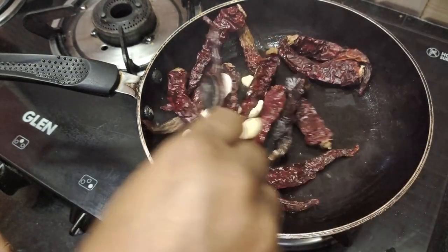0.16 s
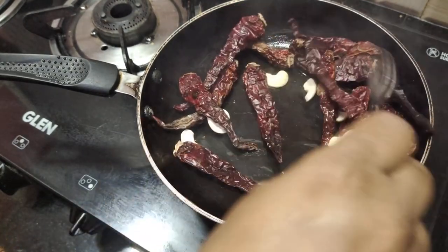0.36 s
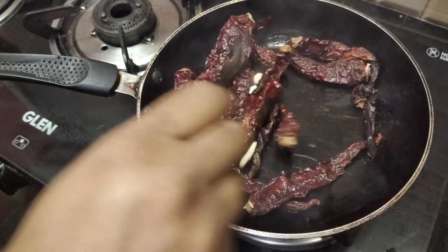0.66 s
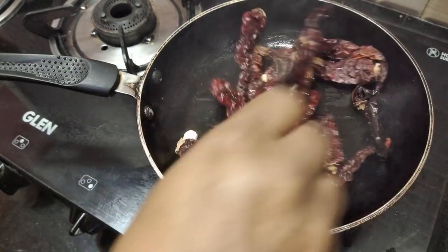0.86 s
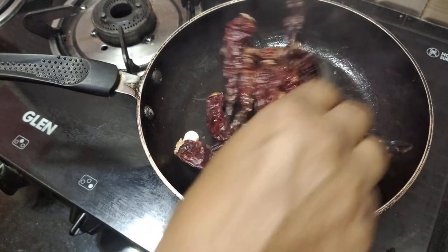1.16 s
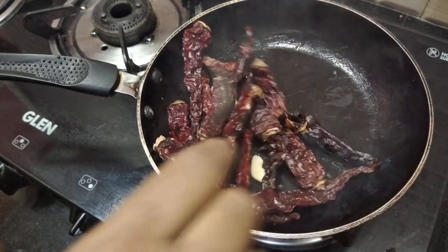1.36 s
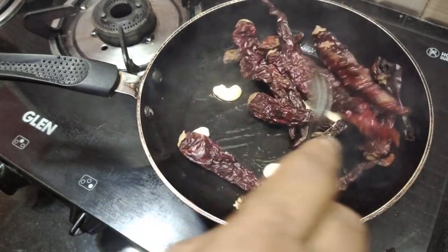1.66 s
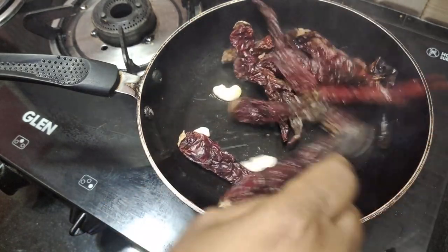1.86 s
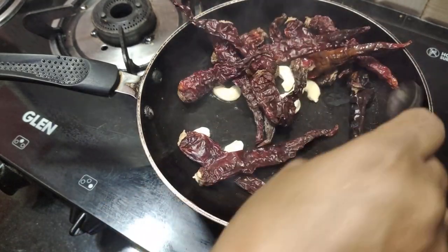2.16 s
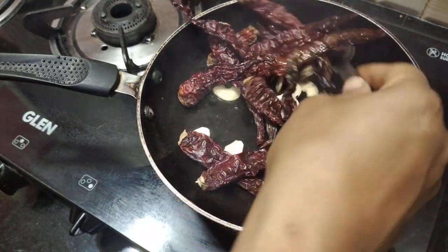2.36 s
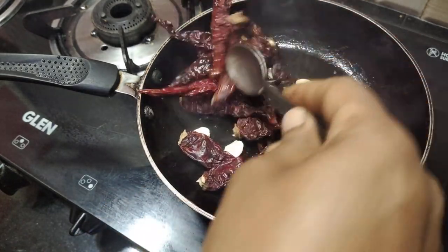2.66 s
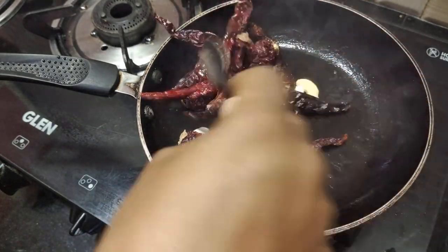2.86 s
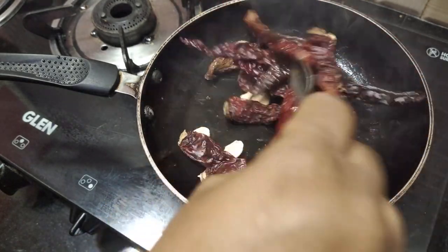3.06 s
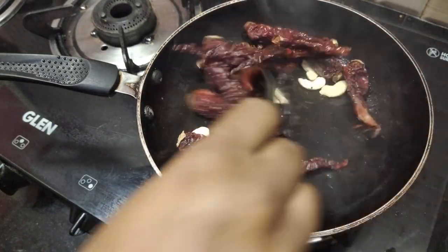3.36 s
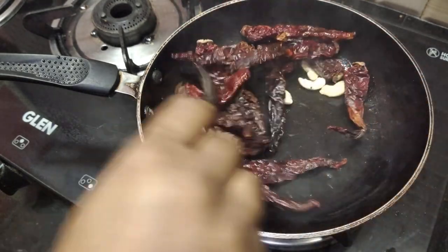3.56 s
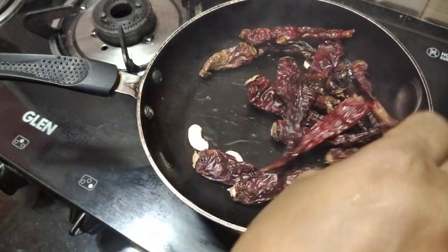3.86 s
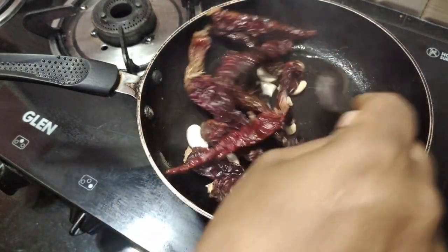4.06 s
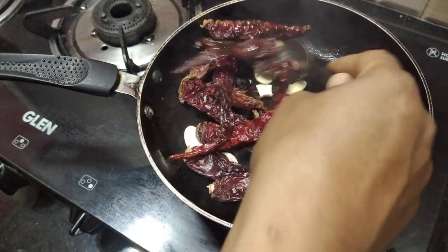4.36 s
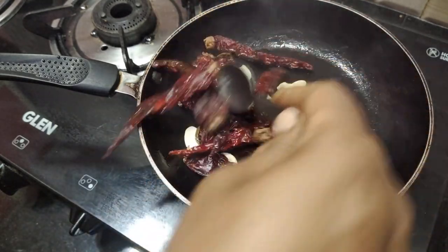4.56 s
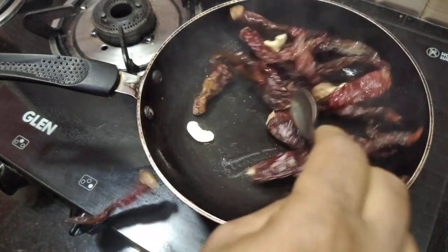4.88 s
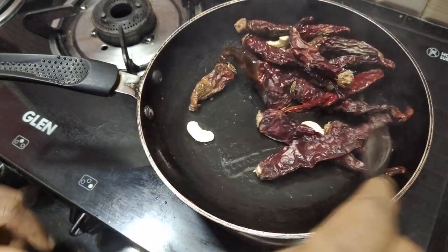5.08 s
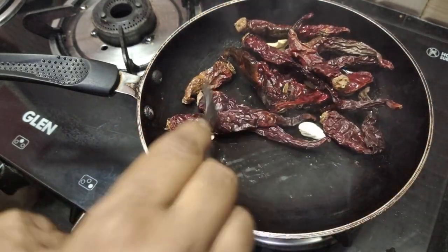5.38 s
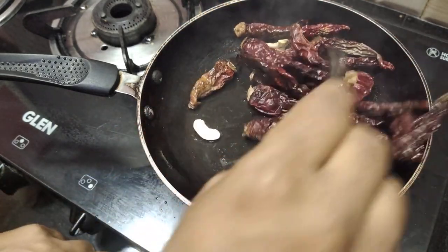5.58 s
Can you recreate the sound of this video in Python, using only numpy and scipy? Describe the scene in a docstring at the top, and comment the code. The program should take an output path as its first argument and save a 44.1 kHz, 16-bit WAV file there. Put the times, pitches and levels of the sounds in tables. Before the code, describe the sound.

A steel spoon stirs dry chillies and nuts in a frying pan, with crackling rustles, ringing scrapes, clinks and snaps.

```python
"""A small tiled kitchen, a phone's two microphones close to a frying pan on the gas hob.
A steel spoon stirs dry chillies and nuts. Each stroke sets the brittle pods crackling and drags the
spoon over the coating; it sticks and slips, so the pan rings and rocks on its grate. The spoon clinks,
knocks and once squeals up the wall, single pods snap, and the gas jets whistle thinly underneath."""
import sys
import numpy as np
from scipy import signal
from scipy.fft import rfft, irfft
from scipy.io import wavfile
from scipy.ndimage import map_coordinates

SR = 44100
rng = np.random.default_rng(int(sys.argv[2]) if len(sys.argv) > 2 else 0)


def digitize_waveform(pressure):
    """Quantize a signal to 16-bit integers and store it at the path in sys.argv[1].

    Rows of a 2-D input are taken as channels; values are limited to [-1, 1].
    """
    field = np.atleast_2d(pressure).T
    bounded = np.clip(field, -1, 1)
    quanta = np.round(bounded * 32767).astype(np.int16)
    wavfile.write(sys.argv[1], SR, quanta)


N = 252260
TIME = np.arange(N) / SR
RING_TIME = TIME[:SR // 2]
SIDES = np.array([[.5], [-.5]])  # splits a difference between left and right

# modes of the pan: (frequency [Hz], relative level [dB], t60 [s])
PAN_MODES = [(295.5, -24, 0.086), (329, -9.5, 0.15), (366.6, -13, 0.09), (500, -15, 0.018),
             (558, -6, 0.043), (669, -7.5, 0.072), (740, -11, 0.052), (975.7, 3.5, 0.075),
             (1004.4, -0.5, 0.088), (985, -15.5, 0.064), (1035, -8, 0.084), (1059.9, 17.5, 0.067),
             (1140, -24, .06), (1560, -13, 0.06), (1720, -23, 0.08), (1742, -7.5, 0.077),
             (1811.5, 0.5, 0.057), (1846, -3, 0.074), (1990, -2, 0.021), (2080, -23.5, 0.1),
             (2380, -34, 0.064), (2890, -13, 0.07)]
# the pan's rocking, base and wall registers: (low edge [Hz], high edge [Hz])
PAN_REGISTERS = [(275, 1030), (1000, 1250), (1330, 2700)]
# modes of the pan's stiff upper wall: (frequency [Hz], relative level [dB], t60 [s])
UPPER_WALL_MODES = [(2670, -2, 0.11), (3320, -11, 0.0044), (4090, -9, 0.063), (4573, -3.5, 0.062),
                    (5740, 0.5, 0.03), (6400, -9, 0.02), (7600, -10, 0.035), (7400, -8, 0.017),
                    (8450, -9, 0.03), (9900, -12, 0.017)]
# modes of the spoon: (frequency [Hz], relative level [dB], t60 [s])
SPOON_MODES = [(630, -16, 0.03), (700, -10, 0.03), (2080, -14, 0.069), (2229, 12.5, 0.028),
               (2523, 7, 0.041), (2820, -1, 0.069), (3200, -12.5, .03), (7300, -10, .035),
               (7920, 2.5, 0.079), (7810, -1, .03), (10060, -11, 0.12), (11600, -11.5, 0.017)]
# where the ringing metal sits between the microphones: (frequency [Hz], left minus right [dB])
METAL_BALANCE = [(330, -7.5), (670, 8.5), (1060, -4), (1850, 2.5), (2800, 3.5), (8000, -1), (12000, 13)]
# spoon against pan: (time [s], rocking [dB], base [dB], wall [dB], contact tick [dB])
SPOON_KNOCKS = [(0.372, -81, -35, -32, -43), (0.409, -83, -41, -45, -63), (0.433, -85, -36.5, -36, -59),
                (0.499, -85, -61, -47, -65), (0.531, -79, -43, -50, -62), (0.577, -83, -44.5, -41.5, -42.5),
                (0.636, -84, -65, -49, -68), (0.681, -93, -44, -57, -62), (0.701, -90, -52, -58, -66),
                (0.79, -86, -46.5, -40, -62), (0.899, -90, -53.5, -50, -72), (0.942, -84, -54.5, -83, -64),
                (1.156, -38.5, -32.5, -39, -36.5), (1.282, -79, -74, -54, -60),
                (1.398, -90, -44.5, -63, -47), (1.446, -76, -48.5, -62, -54),
                (1.79, -73, -51.5, -56.5, -72), (2.183, -45, -46, -44.5, -38), (2.34, -61, -45, -56, -73),
                (2.935, -72, -71, -57, -57.5), (3.045, -85, -46.5, -58, -56), (3.213, -76, -62.5, -68, -56),
                (3.326, -78, -42.5, -58, -51), (3.41, -90, -42.5, -59, -50), (3.595, -73, -56, -53, -50),
                (3.612, -83, -56, -54, -51), (3.714, -81, -56, -48.5, -46.5),
                (3.919, -44, -35.5, -50, -45.5), (3.934, -48.5, -51, -48.5, -67),
                (3.97, -71, -44, -63, -50), (4.251, -44, -35, -50.5, -43.5), (4.269, -46, -42.5, -55, -72),
                (4.345, -50, -53, -50, -60), (4.375, -86, -57, -42, -42.5), (4.4, -81, -43.5, -45.5, -62),
                (4.491, -73, -46, -40, -67), (4.632, -85, -47, -48.5, -67), (4.85, -64, -46.5, -62, -68),
                (4.95, -52.5, -43.5, -63, -54), (5.125, -95, -69, -54, -46.5)]
# the spoon's edge squeals up the wall: (time [s], rough ringing [dB], clear note [dB])
WALL_SQUEAL = [(4.28, -57, -66), (4.305, -61, -69), (4.33, -52, -48.5), (4.358, -47, -42),
               (4.375, -53, -49), (4.41, -48, -49), (4.43, -62, -69), (4.45, -68, -72)]


def undb(db):
    """Decibels to gain."""
    return 10 ** (np.asarray(db) / 20)


def rms(x):
    """Root mean square."""
    return np.sqrt(np.mean(x ** 2))


def curve(rows, column=1):
    """Gain over time from a dB column; silent outside the table."""
    rows = np.asarray(rows)
    return undb(np.interp(TIME, rows[:, 0], rows[:, column], left=-np.inf, right=-np.inf))


def at_hz(hz, rows, column=1):
    """A column of a spectrum table, read on a log-frequency axis."""
    rows = np.asarray(rows, float)
    return np.interp(np.log(hz + 1), np.log(rows[:, 0]), rows[:, column])


def through(x, response):
    """Pass a sound through an impulse response for each microphone."""
    return signal.fftconvolve(np.atleast_2d(x), response, axes=1)[:, :np.shape(x)[-1]]


def fade(t60):
    """Exponential decay, 60 dB in t60 seconds."""
    return np.exp(-np.log(1000) * RING_TIME / max(t60, 1e-3))


def ring_noise():
    """Half a second of white noise in two channels."""
    return rng.standard_normal((2, len(RING_TIME)))


def add(out, start_s, sound):
    """Mix a sound in at a time."""
    i = max(int(start_s * SR), 0)
    out[:, i:i + sound.shape[1]] += sound[:, :N - i]


def unit_blow(x):
    """Scale a blow to rms 1 over its first 20 ms."""
    return x / rms(x[:, :SR // 50])


def colour(rows, column=1, size=1024):
    """Minimum-phase response with the given spectral shape and unit energy."""
    magnitude = undb(at_hz(np.fft.rfftfreq(size, 1 / SR), rows, column))
    cepstrum = irfft(np.log(magnitude))
    cepstrum[1:size // 2] *= 2
    cepstrum[size // 2 + 1:] = 0
    response = irfft(np.exp(rfft(cepstrum)))
    return response / np.linalg.norm(response)


def grains(rate, spread_db):
    """Random tiny contacts, many faint and a few strong; rms 1 at any rate."""
    chance = np.clip(rate / SR, 1e-4, 1)
    sizes = undb(spread_db * np.minimum(rng.exponential(size=N), 4.5))
    contacts = (rng.random(N) < chance) * sizes / np.sqrt(chance)
    return contacts / rms(contacts)


def flutter(rate, depth_db):
    """A gain that wanders at random about 1, with `rate` turns a second."""
    knots = rng.standard_normal(4000)
    gain = undb(depth_db * np.interp(TIME * rate, np.arange(len(knots)), knots))
    return gain / rms(gain)


def bend(sound, depth, rate):
    """A wandering delay slides all the resonances of a sound up and down."""
    lag_s = depth * np.log(flutter(rate, depth_db=2))
    positions = (TIME + lag_s) * SR
    return np.array([map_coordinates(side, [positions], order=3, mode="mirror") for side in sound])


def ring(modes, lo_hz, hi_hz, wash_db, wash_t60, skid_s):
    """One register of struck metal over a wash of crowded modes; a skid softens the start."""
    apart_hz = 1500  # shorter waves reach the two microphones further out of step
    tones = 0
    for hz, db, t60 in modes:
        if lo_hz <= hz < hi_hz:
            lag = min(hz / apart_hz, np.pi / 2) * SIDES
            detuned_hz = hz * (1 + 0.0031 * rng.standard_normal())
            phase = 2 * np.pi * detuned_hz * RING_TIME + 0.32 * rng.standard_normal((2, 1))
            gain = undb(db + at_hz(hz, METAL_BALANCE) * SIDES)
            tones += gain * fade(t60) * np.sin(phase - lag)
    mid, side = ring_noise() * fade(wash_t60)
    band = signal.butter(4, [lo_hz, hi_hz], "band", fs=SR, output="sos")
    wash = signal.sosfilt(band, mid + side * SIDES * min(hi_hz / apart_hz, 2))
    onset = 1 - np.exp(-RING_TIME / max(skid_s, 1e-4))
    return unit_blow((unit_blow(tones) + undb(wash_db) * unit_blow(wash)) * onset)


def effort(part, release):
    """Each push builds, eases as the heap gives way, then dies away over `release` of its settling."""
    # (start [s], rise [s], hold [s], settling [s], pods [dB], coating [dB], rocking [dB])
    strokes = [(-.012, 0.011, 0.063, 0.14, -45, -56, -66), (0.158, 0.071, 0.01, 0.28, -43, -42.5, -60),
               (0.356, 0.078, 0.18, 0.092, -47, -47, -72), (0.641, 0.0064, 0.035, 0.21, -48, -53.5, -70.5),
               (0.759, 0.0052, 0.083, 0.27, -43, -49, -72.5), (1.119, 0.062, 0.1, 0.18, -45, -49.5, -55),
               (1.372, 0.03, 0.0083, 0.16, -52.5, -50, -87), (1.473, 0.0022, 0.15, 0.25, -47, -50, -68),
               (1.778, 0.0095, 0.22, 0.087, -52.5, -61.5, -65.5),
               (1.898, 0.038, 0.041, 0.26, -45, -52, -67), (2.177, 0.05, 0.066, 0.28, -47.5, -48, -45.5),
               (2.487, 0.0081, 0.14, .05, -75, -77.5, -86), (2.586, 0.09, 0.0073, 0.17, -54.5, -69.5, -88),
               (2.933, 0.091, 0.043, 0.29, -50, -52, -82), (3.304, 0.059, 0.054, 0.11, -45.5, -49, -78),
               (3.539, 0.0082, 0.014, 0.0486, -57, -70, -85), (3.592, 0.016, 0.096, 0.25, -47, -50.5, -63),
               (3.912, 0.087, 0.061, 0.31, -48, -49, -64), (4.228, 0.017, 0.16, 0.066, -55, -58, -65),
               (4.354, 0.011, 0.012, 0.44, -47.5, -48, -67), (4.717, 0.21, 0.014, 0.17, -45, -52.5, -62),
               (5.112, 0.023, 0.18, 0.11, -51.5, -58, -66.5),
               (5.418, 0.0042, 0.097, 0.22, -45.5, -54, -72.5)]
    column = {"pods": 4, "coating": 5, "rocking": 6}[part]
    first_touch_db, settle_db = -10.5, 23.5
    approach_db_per_s, sag_db_per_s = 901, 12
    out = np.zeros(N)
    for row in strokes:
        start, rise, hold, settling = row[:4]
        t = TIME - start
        approach = approach_db_per_s * np.minimum(t, 0)  # the spoon brushes the first pods
        building = first_touch_db * np.clip(1 - t / rise, 0, 1)
        easing = sag_db_per_s * np.clip(t - rise, 0, hold)
        dying = settle_db * (np.maximum(t - rise - hold, 0) / (release * settling)) ** 1.355
        out = np.maximum(out, undb(row[column] + approach + building - easing - dying))
    return out


def rustle(push, pod, count=4):
    """Pods catch and slip, more often under a harder push; their hollow tones shift as they bend."""
    # skins sliding flat on the coating: (frequency [Hz], relative left [dB], relative right [dB])
    swish_spectrum = [(976, -42, -47), (4200, -5, 6.5), (5900, -11, -5), (8370, 5.5, 10.5),
                      (11050, -5, 2.5), (12860, 0, -3.5), (15200, -9.5, -1.5)]
    # how much they slide rather than tumble: (time [s], swish gain [dB])
    sliding = [(0, -4), (.9, -6.5), (1.3, -12), (1.7, -6), (2.7, 0.5), (3.1, -4), (3.8, -12), (4.35, 2),
               (4.62, -30), (4.8, -30), (5.7, -12)]
    tumble = 0
    turns = np.array([flutter(rate=25, depth_db=5) for _ in range(count)])
    for share in turns / np.linalg.norm(turns, axis=0):  # the pods share the push between them
        slips = grains(rate=650 * (push / push.max()) ** .5, spread_db=2) * share
        bearing = rng.uniform(0, 2 * np.pi, N)  # every slip radiates its own way
        slips = slips * np.array([np.cos(bearing), np.sin(bearing)])
        shell = through(ring_noise() * (fade(0.001) + undb(-7) * fade(0.028)), pod)
        shell *= np.linalg.norm(pod, axis=1, keepdims=True) / np.linalg.norm(shell, axis=1, keepdims=True)
        tumble += bend(through(slips, shell), depth=0.006, rate=8)
    skins = np.array([undb(1.5) * colour(swish_spectrum, 1), undb(1) * colour(swish_spectrum, 2)])
    swish = through(rng.standard_normal((2, N)), skins)
    catches = flutter(rate=73, depth_db=1.04)  # the whole heap catches and gives way
    return push * catches * (undb(2) * tumble + curve(sliding) * swish)


def crackles(push, count=700):
    """Tiny breaks scattered through the rustle, each with its own tone, size and direction."""
    low_hz, high_hz = 2020, 8760
    smallest_db, spread_db = -2, 4.5  # against the push
    t = RING_TIME[:SR // 50]
    decay = fade(t60=0.018)[:len(t)]
    out = np.zeros((2, N))
    for when, tone, rarity, turn in rng.random((count, 4)):
        i = int(when * (N - 1))
        size = push[i] * undb(smallest_db + spread_db * min(-np.log(rarity), 3))
        hz = low_hz * (high_hz / low_hz) ** tone
        ping = size * decay * np.sin(2 * np.pi * hz * t)
        bearing = 2 * np.pi * turn
        add(out, TIME[i], np.outer([np.cos(bearing), np.sin(bearing)], ping))
    return out


def rub(body, gain, rate, spread_db, bend_depth=0.00033):
    """Stick and slip: bouts of tiny jerks keep a body ringing; the moving contact bends its pitch."""
    bouts = np.minimum(flutter(rate=32, depth_db=4), 2)
    slips = grains(rate, spread_db) * rng.choice([-1, 1], N) * bouts
    ringing = through(slips * gain, body / np.sqrt(np.sum(body ** 2) / 2))
    return bend(ringing, bend_depth, rate=30)


def scrape():
    """The spoon drags on the coating: the pan rocks, base and wall ring, the spoon chatters and squeals."""
    # chatter of the loosely held spoon: (time [s], level [dB])
    chatter = [(0, -40.5), (.1, -50), (.135, -46), (.17, -51.5), (.34, -45.5), (.52, -48.5), (.66, -55.5)]
    rocking_hz, base_hz, wall_hz = PAN_REGISTERS
    drag = effort("coating", release=0.61)
    shove = effort("rocking", release=0.61)
    rocking = ring(PAN_MODES, *rocking_hz, wash_db=-16.5, wash_t60=0.024, skid_s=0.0012)
    out = rub(rocking, np.hypot(shove, rattle()), rate=700, spread_db=2, bend_depth=0.0024)
    base = ring(PAN_MODES, *base_hz, wash_db=-49.5, wash_t60=0.013, skid_s=0.0024)
    out += rub(base, undb(-1.5) * drag, rate=700, spread_db=2, bend_depth=0.00017)
    wall = ring(PAN_MODES, *wall_hz, wash_db=-11, wash_t60=0.096, skid_s=0.00025)
    wall_drive = np.hypot(undb(-5) * drag, undb(-7.5) * bites())
    out += rub(wall, wall_drive, rate=900, spread_db=3)
    spoon = ring(SPOON_MODES, 640, 3440, wash_db=-1, wash_t60=0.032, skid_s=0.0015)
    out += rub(spoon, curve(chatter), rate=500, spread_db=3.5)
    upper_wall = ring(UPPER_WALL_MODES, 5000, 12500, wash_db=-6, wash_t60=0.014, skid_s=0.0017)
    return out + rub(upper_wall, curve(WALL_SQUEAL), rate=2500, spread_db=3, bend_depth=0.00078)


def burner():
    """Gas jets whistle in narrow, restless bands over the room tone of the kitchen."""
    # (frequency [Hz], relative level [dB])
    room_tone = [(25, 6), (60, -11), (100, 19.5), (200, 9), (330, 10.5), (600, 7.5), (1500, -4),
                 (4000, -12), (8000, 8.5), (10000, 14.5), (11000, -9), (13500, 3), (16000, -17)]
    # whistling bands: (centre [Hz], nominal width [Hz], level before the drift [dB])
    jets = [(7330, 230, -75.5), (8750, 210, -62.5), (9470, 210, -60.5), (9600, 140, -63.5),
            (9950, 110, -73.5)]
    # the whistle slowly sinks: (time [s], gain [dB])
    drift = [(0, 4), (1.8, 0.5), (2.9, 0), (3.9, -2.5), (4.7, -3), (5.4, -9)]
    drift_db = np.interp(TIME, *np.transpose(drift))
    hz = np.fft.rfftfreq(N, 1 / SR)
    out = undb(-73.5) * through(rng.standard_normal((2, N)), colour(room_tone, size=4096)[None])
    for centre, width, db in jets:
        band = (1 + ((hz - centre) / (width * 0.48)) ** 2) ** -4.6
        jet = irfft(rfft(rng.standard_normal((2, N))) * band, N)
        out += undb(db + drift_db) * jet / rms(jet)
    return out


def clinks():
    """A glancing touch leaves the spoon free to ring: stem low, handle higher, bowl highest."""
    # (time [s], stem [dB], handle [dB], bowl [dB])
    touches = [(0.0468, -58, -37.5, -40), (0.0941, -60.5, -42.5, -45), (0.159, -68, -43.5, -51),
               (0.175, -68, -62.5, -44.5), (0.258, -53, -48, -54.5), (0.2993, -53, -38, -34.5),
               (0.3805, -55, -40, -37), (0.4622, -62.5, -42.5, -41.5)]
    out = np.zeros((2, N))
    for s, stem_db, handle_db, bowl_db in touches:
        stem = ring(SPOON_MODES, 560, 780, wash_db=-1, wash_t60=0.059, skid_s=0.001)
        handle = ring(SPOON_MODES, 1670, 3200, wash_db=-1.5, wash_t60=0.1, skid_s=0.00092)
        bowl = ring(SPOON_MODES, 7600, 13500, wash_db=-6.5, wash_t60=0.036, skid_s=0.0003)
        add(out, s, undb(stem_db) * stem + undb(handle_db) * handle + undb(bowl_db) * bowl)
    return out


def thuds():
    """The pan tips softly onto its grate, waking only the lowest modes."""
    # (time [s], level [dB])
    landings = [(0.193, -63), (0.246, -65), (1.163, -43.5), (1.48, -68.5), (2.206, -54), (2.228, -51.5),
                (2.764, -73.5), (3.213, -72.5)]
    out = np.zeros((2, N))
    for s, db in landings:
        add(out, s, undb(db) * ring(PAN_MODES, 295, 420, wash_db=-7, wash_t60=0.083, skid_s=0.0048))
    return out


def bites(half_length_s=0.019):
    """Brief swells of pressure as the spoon's edge catches in the coating."""
    # (time [s], level [dB])
    swells = [(0.231, -44), (0.568, -33), (0.70, -43.5), (0.84, -47), (1.283, -37.5), (2.276, -41.5),
              (3.063, -46), (3.421, -46), (3.994, -48), (4.06, -43.5), (4.133, -45.5), (4.409, -39.5),
              (4.875, -47), (5.17, -52)]
    return sum(undb(db) * np.exp(-((TIME - s) / half_length_s) ** 2) for s, db in swells)


def bowed_base(note_hz=1058):
    """While the edge bites, the slips lock to the pan's base and it swells into a wavering note."""
    phase = 2 * np.pi * np.cumsum(note_hz * flutter(rate=160, depth_db=0.22)) / SR
    grip = flutter(rate=130, depth_db=3.5)
    balance = undb(at_hz(note_hz, METAL_BALANCE) * SIDES)
    return bites() * grip * balance * np.sin(phase - 0.73 * SIDES)


def snaps(pod, splinter_t60=0.12):
    """A pod cracks or a nut drops: the hollow body pops, the skin ticks, faint splintering follows."""
    # (time [s], t60 of the crack [s], body peak [dB], skin peak [dB])
    cracks = [(0.254, 0.037, -26, -37), (0.653, .025, -24.5, -33), (0.766, .04, -29, -46),
              (1.416, 0.018, -40, -34.5), (1.474, 0.014, -22.5, -40), (1.478, 0.12, -24.5, -47),
              (1.709, .003, -55, -37), (1.741, .004, -55, -32.5), (1.76, .004, -54, -29),
              (1.802, .004, -50, -27), (1.825, .004, -53, -34), (2.037, .012, -32, -31.5),
              (2.246, .02, -38, -32), (2.2665, 0.016, -22.5, -22), (2.343, 0.015, -29.5, -24.5),
              (2.4, .01, -58, -42), (2.452, 0.0073, -41.5, -35), (2.495, 0.014, -50, -38.5),
              (2.577, 0.011, -62, -31), (2.684, .025, -32.5, -53), (3.312, 0.042, -30, -39),
              (3.491, 0.01, -23, -27), (3.681, 0.013, -31.5, -43), (4.895, 0.021, -28, -25),
              (4.932, 0.037, -30, -32), (4.947, .02, -29, -31), (5.045, .02, -40, -38),
              (5.216, .04, -29, -42), (5.219, 0.031, -32, -34), (5.27, 0.17, -32, -39),
              (5.4243, .04, -30, -35), (5.561, 0.016, -39, -36)]
    # tick of a splitting skin: (frequency [Hz], relative level [dB])
    skin_spectrum = [(1000, -29), (3000, -36), (6000, -24.5), (7300, -3.5), (8200, 6.5), (9300, -7.5),
                     (10800, -15), (13000, -6.5), (15500, -13.5)]
    skin = colour(skin_spectrum)[None]
    out = np.zeros((2, N))
    for s, t60, body_db, skin_db in cracks:
        pop = through(ring_noise() * (fade(t60) + undb(-9.5) * fade(splinter_t60)), pod)
        tick = through(ring_noise() * (fade(t60) + undb(-6) * fade(0.045)), skin)
        add(out, s, undb(body_db) * pop / np.abs(pop).max() + undb(skin_db) * tick / np.abs(tick).max())
    return out


def knocks(pod):
    """Where the spoon lands sets how much each register of the pan rings; the contact itself ticks."""
    rocking_hz, base_hz, wall_hz = PAN_REGISTERS
    out = np.zeros((2, N))
    for s, rocking_db, base_db, wall_db, tick_db in SPOON_KNOCKS:
        rocking = ring(PAN_MODES, *rocking_hz, wash_db=-11, wash_t60=0.16, skid_s=0.0012)
        base = ring(PAN_MODES, *base_hz, wash_db=-43.5, wash_t60=0.021, skid_s=0.007)
        wall = ring(PAN_MODES, *wall_hz, wash_db=-24, wash_t60=0.15, skid_s=0.0024)
        add(out, s, undb(rocking_db) * rocking + undb(base_db) * base + undb(wall_db) * wall)
        tick = unit_blow(through(ring_noise() * fade(0.086), pod))
        upper_wall = ring(UPPER_WALL_MODES, 2770, 6500, wash_db=-10, wash_t60=0.44, skid_s=0.0001)
        # harder blows are shorter, so the stiff modes grow faster than the tick
        add(out, s, undb(tick_db) * tick + undb(2.075 * tick_db + 37) * upper_wall)
    return out


def rattle(fall_db_per_s=156):
    """How hard the pan rattles on the grate after each knock, until it comes to rest."""
    return sum((TIME >= s) * undb(rocking_db - 2 - fall_db_per_s * np.abs(TIME - s))
               for s, rocking_db, *_ in SPOON_KNOCKS)


def rim_taps():
    """The spoon's neck taps the rim lightly, waking only a narrow, high band of the wall."""
    # (time [s], level [dB])
    taps = [(0.373, -41), (0.409, -45), (0.436, -50), (1.28, -46), (1.316, -47.5)]
    out = np.zeros((2, N))
    for s, db in taps:
        add(out, s, undb(db) * ring(PAN_MODES, 2710, 3030, wash_db=0, wash_t60=0.054, skid_s=0.00091))
    return out


def judder(groan_hz=100):
    """The pan judders as it slides on the grate: a short, low groan."""
    # (time [s], level [dB])
    slide = [(1.86, -69), (1.95, -84), (2.0, -54.5), (2.05, -84), (2.11, -90)]
    return curve(slide) * flutter(rate=45, depth_db=3) * np.sin(2 * np.pi * groan_hz * TIME)


def squeak(slip_hz=1940):
    """At the height of the squeal the slips lock near a wall mode and give a thin, wavering note."""
    # (multiple of the slip rate, relative level [dB])
    partials = [(1, -3.5), (3, -11), (4, 3.5), (5, -4), (6, -12)]
    phase = 2 * np.pi * np.cumsum(slip_hz * flutter(rate=300, depth_db=0.12)) / SR
    note = np.zeros((2, N))
    for side in note:
        for multiple, db in partials:
            gain = undb(db) * flutter(rate=150, depth_db=6.5)
            side += gain * np.sin(multiple * phase + rng.uniform(0, np.pi))
    return curve(WALL_SQUEAL, column=2) * note


def room(x, wet_db, t60, damp_hz):
    """Tiled walls return a short, slightly dull tail."""
    tail = ring_noise() * fade(t60) * (RING_TIME > 0.005)
    tail /= np.sqrt(np.sum(tail ** 2) / 2)
    tail = signal.sosfilt(signal.butter(1, damp_hz, fs=SR, output="sos"), tail)
    return x + undb(wet_db) * through(x, tail)


def scene():
    """The stirring close up, the kitchen walls behind it, the burner underneath."""
    # dry pods at the microphones: (frequency [Hz], relative left [dB], relative right [dB])
    pod_spectrum = [(310, -49, -45), (467, -41.5, -46), (700, -18.5, -22), (850, -19.5, -23),
                    (1360, -17, -16), (2110, -13.5, -11.5), (3040, -12, -14.5), (4150, -9.5, -9),
                    (5030, -12, -15), (6250, -7.5, -10.5), (7260, 1, -7.5), (8240, -10, -2),
                    (9080, -17.5, -11.5), (10800, -16.5, -21.5), (12800, -16, -21), (15700, -34.5, -35)]
    pod = np.array([undb(5.5) * colour(pod_spectrum, 1), undb(1.5) * colour(pod_spectrum, 2)])
    push = effort("pods", release=0.84)
    stirring = rustle(push, pod) + crackles(push) + scrape() + bowed_base() + squeak()
    stirring += knocks(pod) + thuds() + rim_taps() + clinks() + snaps(pod) + judder()
    return room(stirring, wet_db=-8, t60=0.3, damp_hz=9400) + burner()


def record(dry):
    """The phone cuts the top octave short with a steep low-pass."""
    top_hz = 15600
    return signal.sosfilt(signal.ellip(8, 0.2, 70, top_hz, fs=SR, output="sos"), dry)


dry = scene()
out = record(dry)
digitize_waveform(out)
```